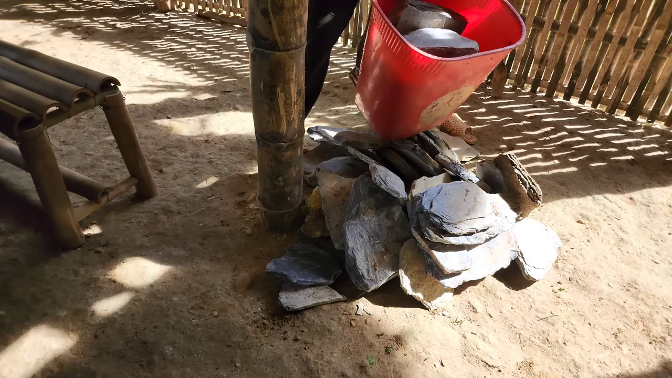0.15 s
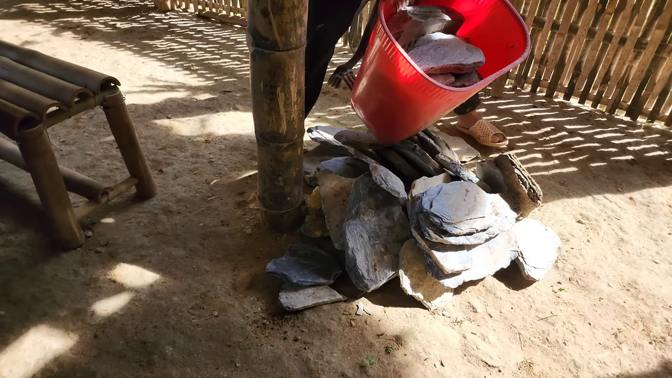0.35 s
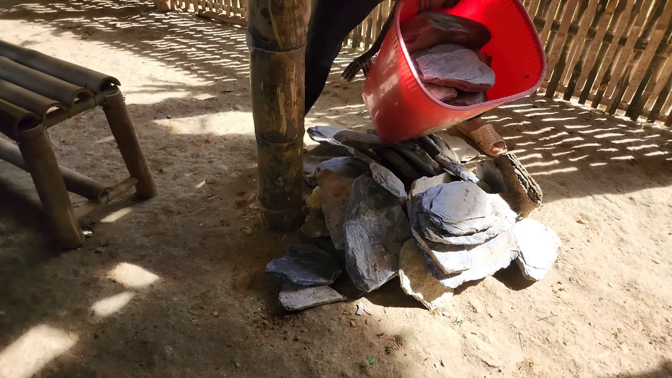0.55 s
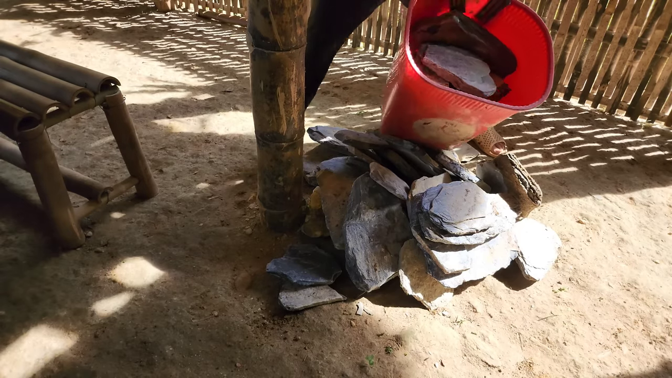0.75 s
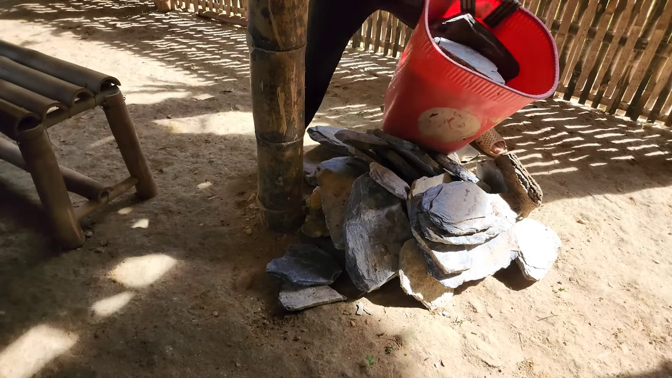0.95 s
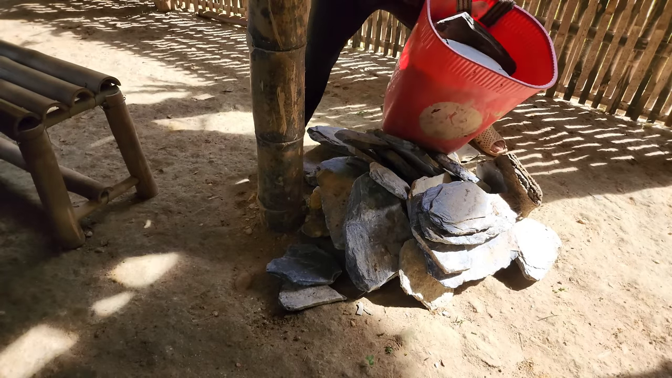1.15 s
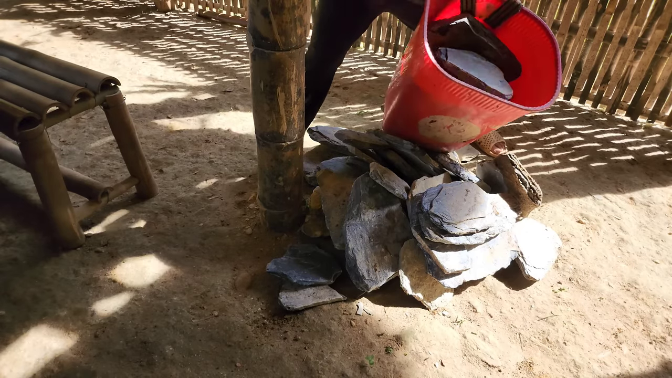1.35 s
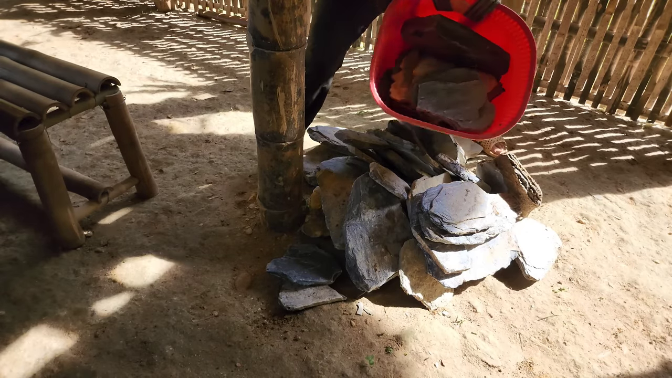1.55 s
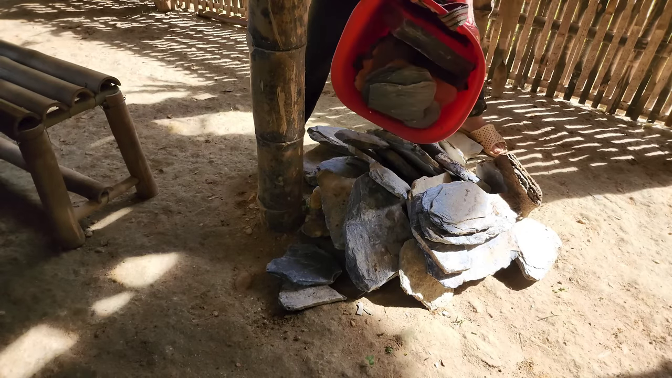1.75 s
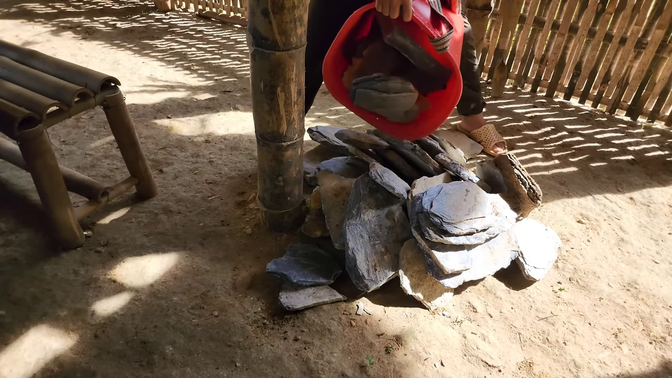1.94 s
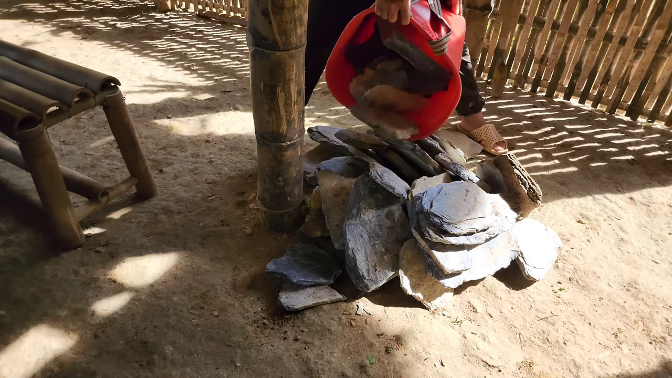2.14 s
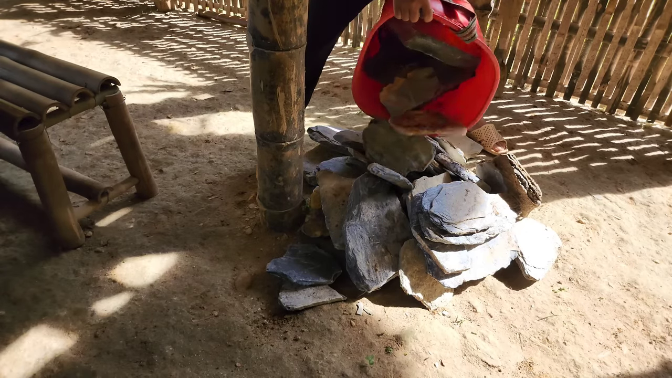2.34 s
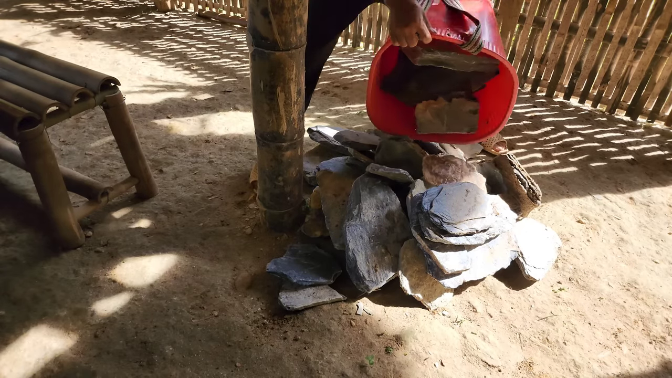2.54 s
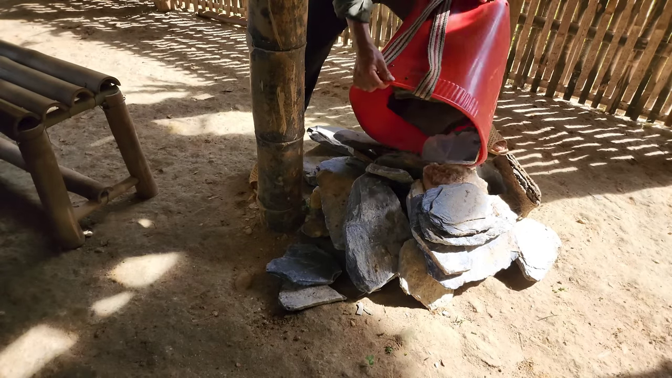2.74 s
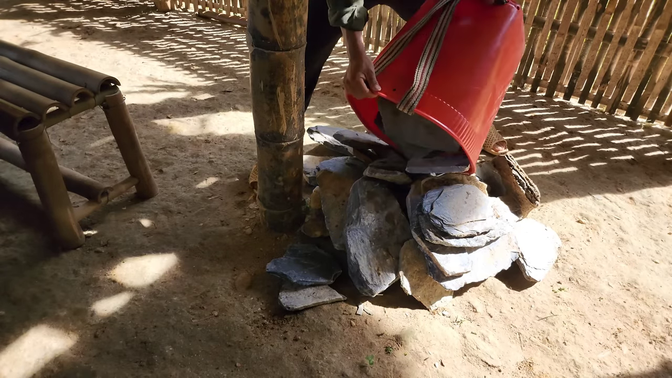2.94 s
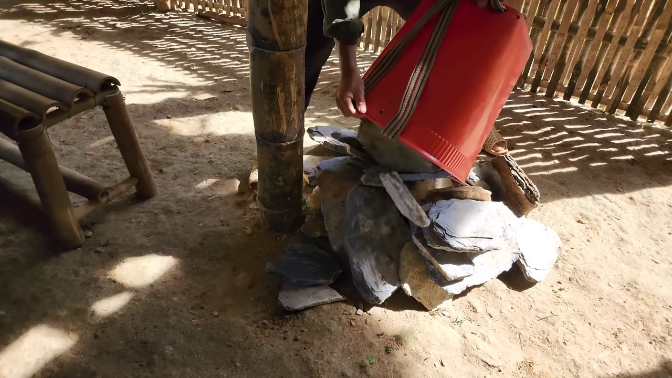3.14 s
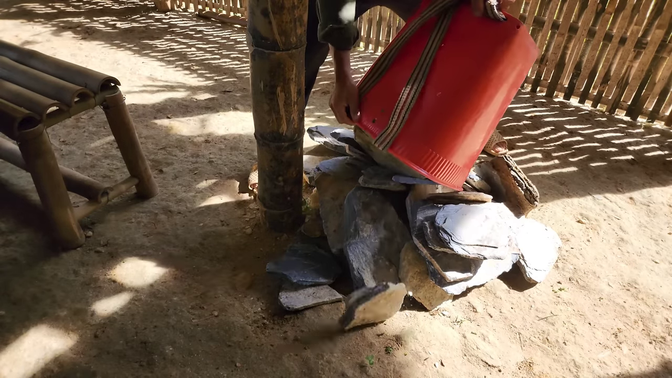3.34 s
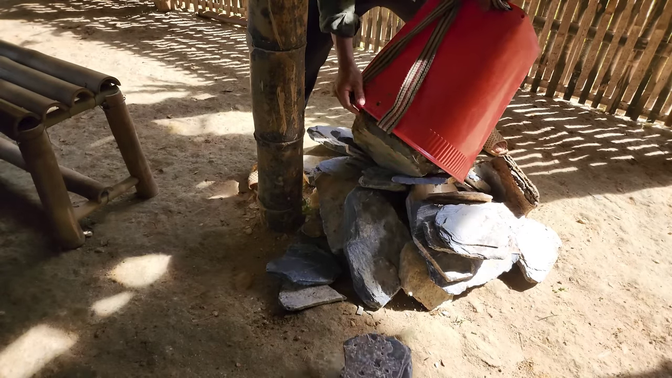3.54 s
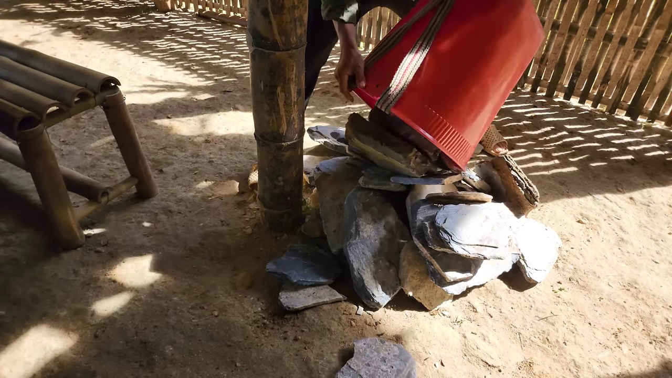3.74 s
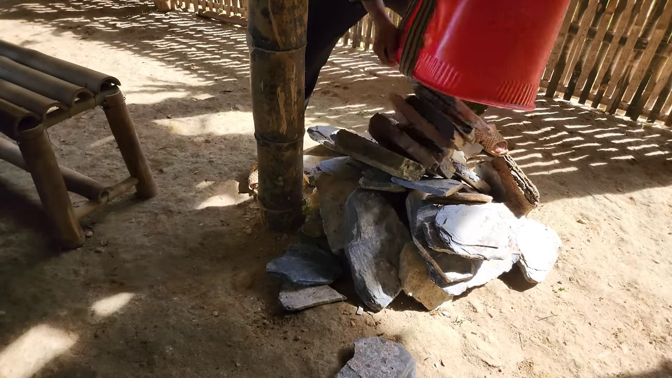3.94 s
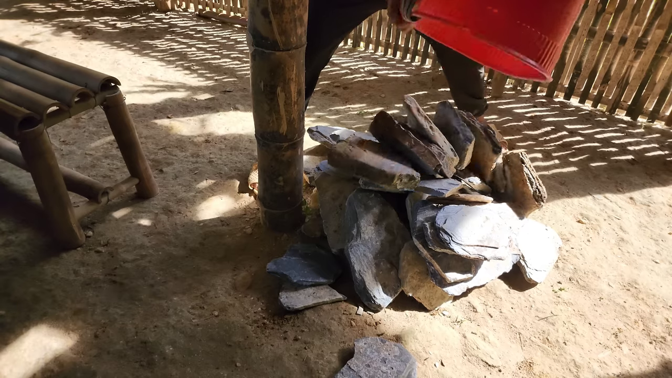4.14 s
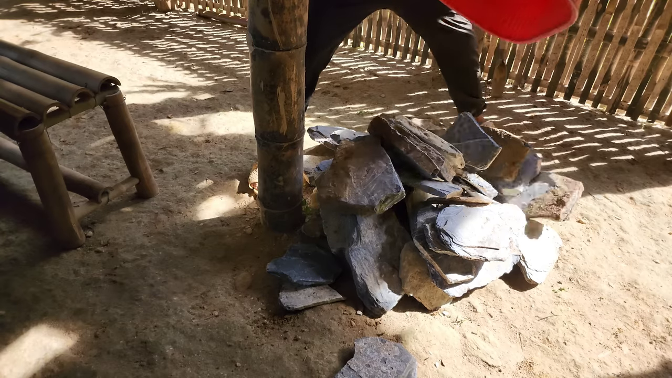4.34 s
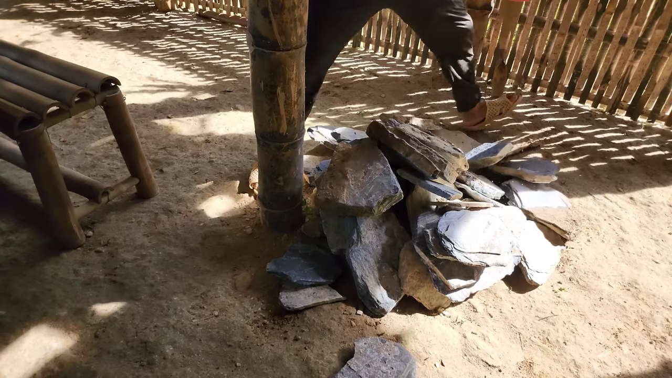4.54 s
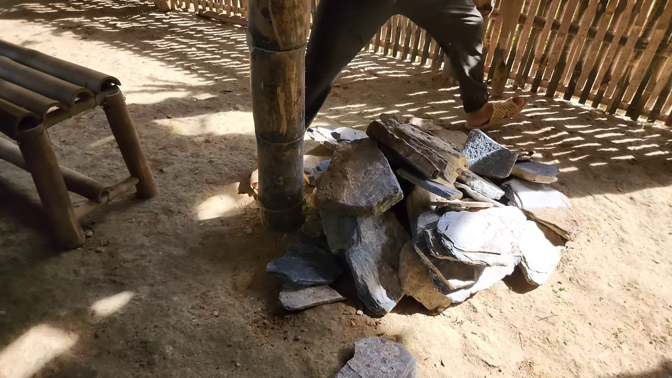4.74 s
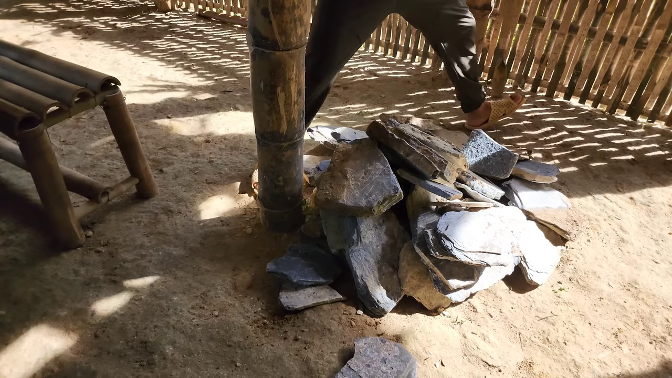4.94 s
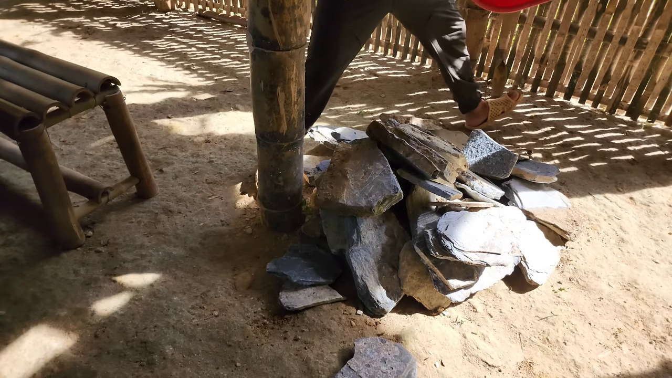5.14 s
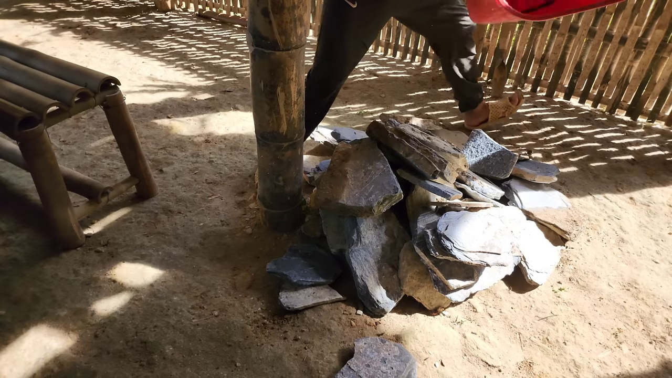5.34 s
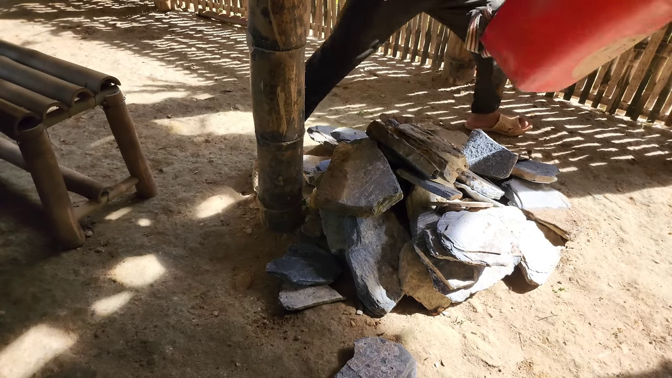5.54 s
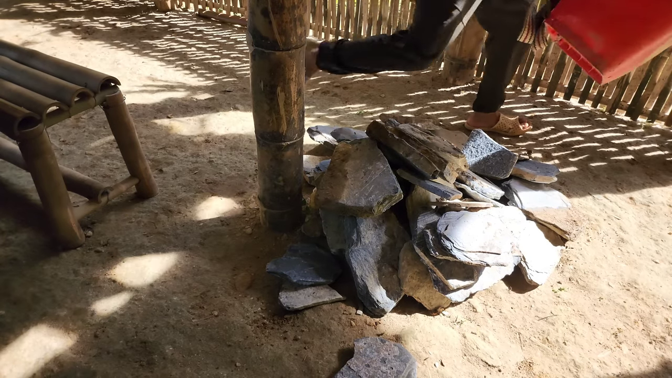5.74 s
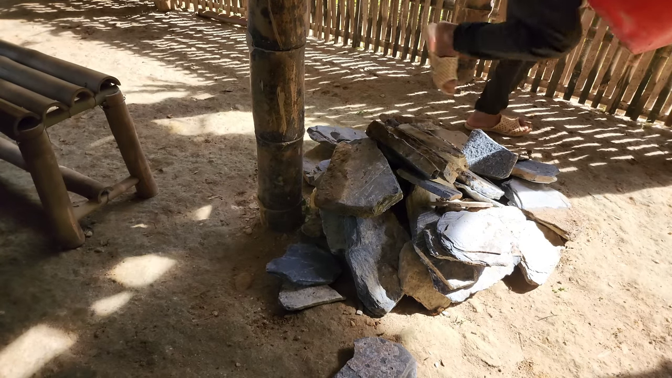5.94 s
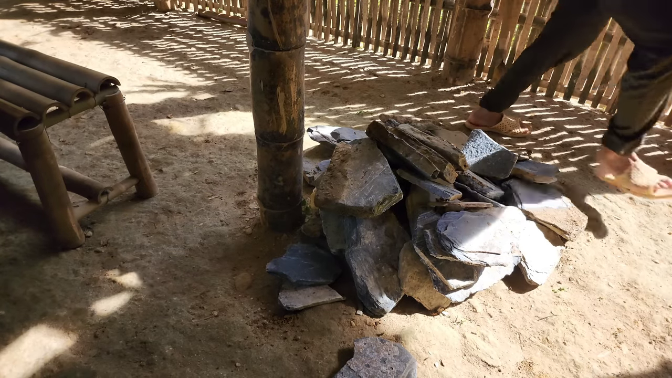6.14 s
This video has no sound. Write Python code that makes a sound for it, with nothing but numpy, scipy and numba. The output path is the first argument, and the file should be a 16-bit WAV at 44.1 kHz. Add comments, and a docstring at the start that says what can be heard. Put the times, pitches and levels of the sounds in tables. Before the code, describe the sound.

Under an open bamboo shelter, flat stones knock lightly in a plastic bucket, then pour out in a dense, hard clatter with scrapes, gritty hiss, ringing slab notes and hollow bucket booms. A last group tumbles onto the pile, then a few soft steps and a distant falling bird call over faint insects. Recorded a couple of metres away, with low wind gusts.

```python
"""Stones tumbling from a bucket

Flat stones shift, scrape and tumble out of a plastic bucket onto a pile under an open bamboo shelter.
Struck modes make the stone clacks, the clear-ringing slab and the booming bucket; grit is gated noise.
Soft steps and a far bird, a gliding tone, follow; insects throughout and several wind gusts are shaped noise.
A phone stands a couple of metres off."""
import sys
import numpy as np
from scipy import signal
from scipy.fft import rfft, irfft
from scipy.io import wavfile
from scipy.ndimage import uniform_filter1d
from numba import njit

SR = 44100
rng = np.random.default_rng(int(sys.argv[2]) if len(sys.argv) > 2 else 0)


def store_pcm(level_fs):
    """Save levels as 16-bit WAV."""
    pcm = np.round(np.clip(level_fs, -1, 1) * 32767).astype(np.int16)
    wavfile.write(sys.argv[1], SR, np.atleast_2d(pcm).T)


def amplitude_ratio(level_db):
    """Convert a level in decibels to the matching linear amplitude (field) ratio."""
    exponent = np.asarray(level_db, float) / 20
    return 10 ** exponent


N = 277006  # length in samples

# modes of the clear-ringing slab: pitch_hz, level_db (relative), t60_s
SLAB_MODES = [(2976, 1, .08), (3348, 5, .065), (6970, -20, .05)]
# modes of the plastic bucket's wall: pitch_hz, level_db (relative), t60_s
BUCKET_MODES = [(107.7, -3.5, 0.17), (143.3, -4, 0.17), (175, -6, 0.2), (210.4, 7, 0.062),
                (327.6, -5.5, 0.0983), (557, -1.5, .06), (626, -14.5, 0.37)]
# colour of the rough stones: frequency_hz, level_db (relative)
STONE_COLOUR = [(210, -44), (350, -24), (492, -30), (788, -10.5), (1820, 6), (2250, 1), (2770, -30.5),
                (3600, 0.5), (5690, -52.5), (8000, -28.5), (10400, -61), (17600, -120)]
# colour of grit noise: frequency_hz, level_db (per Hz, relative)
GRIT_COLOUR = [(1760, -12), (3000, -13.5), (3170, -16), (3430, -21), (4050, -22.5), (4900, -22.5),
               (7350, -20.5), (9530, -30.5), (14800, -22), (16000, -44)]
# sliding load: time_s, stone_motion_db, weight_on_bucket_wall_db
SLIDING_LOAD = [(0.0, -51.5, -46.5), (0.45, -51.5, -54.5), (1.03, -43, -40.5), (1.26, -64, -66),
                (1.52, -38, -40), (1.75, -32, -18), (1.82, -26, -31), (2.15, -41.5, -31), (2.66, -32, -35),
                (2.89, -25.5, -24), (2.99, -21, -21), (3.17, -21, -30), (3.32, -36.5, -33.5),
                (3.55, -71, -49), (3.8, -47, -39), (4.04, -43, -42.5), (4.42, -32, -43.5),
                (4.69, -44.5, -50.5), (4.9, -67, -64.5), (5.27, -74.5, -72.5), (5.88, -61, -56),
                (6.28, -62, -62)]


def table(rows, x):
    """Columns after the first, joined by straight lines at x."""
    first, *rest = np.transpose(rows)
    return [np.interp(x, first, column) for column in rest]


def colour_db(points, hz):
    """A spectrum read on a log-frequency axis."""
    point_hz, db = np.transpose(points)
    return np.interp(np.log(np.maximum(hz, 1)), np.log(point_hz), db)


def noise(points):
    """Coloured noise of rms 1; left and right share the bass and part in the treble."""
    hz = np.arange(N // 2 + 1) * SR / N
    mid, side = rfft(rng.standard_normal((2, N))) * amplitude_ratio(colour_db(points, hz))
    apart = np.clip(hz / 830.0, 0, 1)
    pair = np.array([mid + apart * side, mid - apart * side])
    x = irfft(pair / np.sqrt(1 + apart ** 2), N)
    return x / x.std()


def walk(rate):
    """Random levels, rate of them a second, joined by ramps; spread near 1."""
    hold = int(SR / rate)
    levels = np.repeat(rng.standard_normal(N // hold + 1), hold)
    return 1.2 * uniform_filter1d(levels, hold)[:N]


@njit
def add_modes(out, start, pole, rise, left, right):
    """Each row is a mode that swells in over the contact and dies away."""
    for k in range(len(start)):
        z, soft = 1 + 0j, 1.
        for i in range(start[k], out.shape[1]):
            out[0, i] += (1 - soft) * (z * left[k]).imag
            out[1, i] += (1 - soft) * (z * right[k]).imag
            z, soft = z * pole[k], soft * rise[k]
            if abs(z) < 1e-3:
                break


def ring(s, hz, db, t60, contact, scatter=1., lag_s=0.):
    """Struck modes; each reaches the two microphone ports with a steady or scattered lag and its own phase."""
    s, hz, db, t60, contact = (np.ravel(a) for a in np.broadcast_arrays(s, hz, db, t60, contact))
    phase_chance, lag_chance = rng.standard_normal((len(s), 2)).T
    gain = amplitude_ratio(db) * np.exp(2j * np.pi * phase_chance)
    lag = lag_s + scatter * 0.00013 * lag_chance  # s between the ports
    split = np.exp(1j * np.pi * hz * lag)
    pole = np.exp(2j * np.pi * hz / SR - np.log(1000) / (np.maximum(t60, 1e-3) * SR))
    rise = np.exp(-1 / (contact * SR))
    out = np.zeros((2, N))
    add_modes(out, (s * SR).astype(np.int64), pole, rise, gain * split, gain / split)
    return out


def bursts(s, db, t60):
    """Envelope that jumps at each time and decays."""
    spikes = np.zeros(N)
    np.add.at(spikes, (s * SR).astype(int), amplitude_ratio(db))
    return signal.lfilter([1], [1, -np.exp(-np.log(1000) / (t60 * SR))], spikes)


def rubbed(modes, column, count, contact, detune, span=(0, (N - 1) / SR)):
    """Small random knocks on an object's modes, as strong as one column of the sliding load."""
    when, which, offset = rng.random((count, 3)).T
    s = span[0] + when * (span[1] - span[0])
    hz, db, t60 = np.array(modes)[(which * len(modes)).astype(int)].T
    load_db = table(SLIDING_LOAD, s)[column]
    return ring(s, hz * (1 + detune * (2 * offset - 1)), load_db + db, t60, contact)


def clacks():
    """A rough stone chatters as it lands: a crowd of very short modes while the faces seat, and a gritty crack."""
    # stone on stone: start_s, level_db, then relative to it upper_body_db, body_top_db, crack_db
    landings = [(0.014, -33.5, -25.5, -34, -22.5), (0.179, -28, -5.5, -7, -18.5),
                (0.276, -45.5, -13, -22, -16), (0.326, -51, -3, -12.5, -6.5), (0.393, -41.5, -4, -20, -20),
                (0.436, -43, -3.5, -29, -13.5), (0.506, -40.5, 1, -8, -11.5), (0.55, -16, -19, -55, -51),
                (0.633, -29.5, -26, -29, -29), (0.735, -34.5, -21, -23, -11.5),
                (0.757, -12.5, -3, -11.5, -24), (0.807, -11.5, -25, -35, -42), (0.846, -22, -19, -24, -31),
                (0.905, -44, -18, -21, -14), (0.951, -32, -36, -28, -24), (0.971, -16.5, -18.5, -37, -33.5),
                (1.011, -27.5, -25, -33, -28), (1.055, -34, -8, -12, -21), (1.07, -23, -11, -27, -32),
                (1.081, -23, -7.5, -26, -29), (1.121, -21.5, -10.5, -22, -27),
                (1.166, -26.5, -15, -12, -25), (1.234, -25, -8, -18, -32), (1.4, -35.5, -13, -31, -25),
                (1.473, -29, -11, -27, -25), (1.489, -25, -28, -35, -32), (1.526, -34.5, -9, -15, -18),
                (1.547, -34, -6, -11, -22), (1.561, -21.5, -17, -20, -32), (1.58, -12.5, -21, -23, -33),
                (1.601, -8.5, -16, -23, -43), (1.616, -3, -17, -28, -37), (1.628, -5, -9.5, -16, -43),
                (1.637, -1.5, -24, -32, -37), (1.664, 2.5, -14, -35, -30.5), (1.699, -10, -10.5, -30, -50),
                (1.739, -4.5, -18, -44, -41), (1.773, -13, -25, -42, -30), (1.786, -8.5, -6.5, -22.5, -33),
                (1.805, -1, -36, -35, -42), (1.826, -9.5, -9.5, -33, -44), (1.846, -7.5, -11, -28, -33),
                (1.875, -5.5, -4.5, -16.5, -29), (1.933, -30, -10, -4, -19), (1.956, -14, -12, -27, -35),
                (1.984, -18, -4, -26, -34), (2.005, -25, -21, -34, -29), (2.072, -11.5, -15, -26, -31),
                (2.099, -16, -23, -36, -35), (2.12, -14.5, -17, -24, -39), (2.165, -12, -28, -32, -38),
                (2.191, -16, -37, -34, -33), (2.243, -40, -17, -16, -8.5), (2.266, -23, -13, -29, -21.5),
                (2.316, 1, -7, -23, -25.5), (2.37, -10, -4, -29, -47), (2.38, -1.5, -13.5, -20, -41),
                (2.405, -12, 0.5, -11, -25), (2.461, -26.5, -23, -22, -14), (2.493, -15, -12, -23, -28),
                (2.546, -11.5, -12.5, -24, -28), (2.574, -11.5, -9, -32, -20.5), (2.586, -7, -4, -33, -36),
                (2.594, -13, -5, -7.5, -25.5), (2.639, -15, -3.5, -17, -17), (2.651, -7.5, -37, -43, -65),
                (2.687, -15, -16, -28, -42), (2.718, -17, -7, -17, -28), (2.747, -15, -10.5, -38, -48),
                (2.776, -5.5, -7.5, -21, -30), (2.805, -3, -14.5, -27, -27), (2.853, -15.5, 6, -4, -15.5),
                (2.892, -13, -18, -33, -18.5), (2.911, -10.5, 2, -34, -20), (2.935, -3.5, -21, -16, -17),
                (2.976, -9, 0.5, -29, -21.5), (3.021, -14, -22, -48, -22), (3.046, -7, -10, -37, -35),
                (3.056, -13.5, -5, -35, -40), (3.066, -3.5, -0.5, -31, -31), (3.101, -9, 0.5, -14, -24),
                (3.151, -20, -12, -20, -25), (3.17, -9.5, -7, -36, -25.5), (3.187, -17, -2, -36, -33),
                (3.233, -10, -8.5, -38, -28.5), (3.25, -17.5, 3, -34, -27), (3.279, -14, 2, -31, -31),
                (3.384, -11, -17.5, -17.5, -24), (3.45, -45.5, -5, 7, -3.5), (3.516, -41.5, -9, -20, -2.5),
                (3.525, -38, -3, -19, -12), (3.556, -29.5, -6, -18, -17.5), (3.567, -32, -17, -21, -11),
                (3.585, -33.5, -5, -5, -17), (3.692, -33, -4, -31, -40), (3.75, -31, -16, -40, -27),
                (3.791, -29, -15, -29, -33), (3.804, -28, -4.5, -10, -32), (3.867, -17, -9, -35, -37),
                (3.873, -17.5, -5.5, -29, -34), (3.898, -10.5, -5, -24, -40), (3.958, -14.5, 0.5, -22, -47),
                (4.018, -35, -21, -33, -44), (4.048, -17.5, -9.5, -52, -53), (4.059, -19, -12.5, -51, -43),
                (4.105, -20.5, -12.5, -44, -39), (4.141, -25, -9, -40, -28), (4.159, -7.5, -7, -18.5, -36),
                (4.217, -3.5, -6, -24, -41), (4.264, -5, -4, -30, -26), (4.353, -19.5, -3, -17, -20),
                (4.385, -18.5, -14, -32, -52), (4.426, -17.5, -8, -50, -46), (4.464, -10, -6, -52, -43),
                (4.487, -8.5, 1.5, -55, -28.5), (4.516, -11, 2, -22, -15.5), (4.533, -9, 4.5, -19, -30),
                (4.596, -16, -7.5, -35, -57), (4.633, -18, -6.5, -42, -54), (4.712, -26, -11, -24, -36),
                (4.745, -22.5, -6, -43, -38), (4.802, -12.5, -6.5, -33, -61), (4.9, -37.5, -18, -29, -32.5),
                (5.182, -51, -8.5, -19.5, -18.5), (5.435, -55.5, -13.5, -18, -19.5),
                (5.468, -47.5, -6.5, -20, -15), (5.655, -51, -20, -18.5, -16.5),
                (5.733, -44.5, -10.5, -26, -31), (5.747, -41.5, -3, -25.5, -28.5),
                (5.842, -50, -6, -31.5, -26), (5.899, -46.5, -15, -28.5, -23),
                (5.921, -45.5, -13, -22.5, -21), (6.068, -45, -19, -22, -24),
                (6.138, -47, -18.5, -20.5, -13.5)]
    s, db, upper_db, top_db, crack_db = np.transpose(landings)[..., None]
    chance = rng.random((len(s), 3, 90))
    hz = 400 * (7000 / 400) ** ((np.arange(90) + chance[:, 0]) / 90)
    upper = np.clip(np.log2(hz / 800), 0, 1)
    top = np.clip(2 * np.log2(hz / 2400), 0, 1)
    low_body_db = upper * upper_db + .5 * colour_db(STONE_COLOUR, hz)
    high_body_db = top_db + 1.5 - 23.0 * np.log2(hz / 4000)
    body_db = (1 - top) * low_body_db + top * high_body_db
    # share of the seating time; many modes start with the first touch
    late = np.maximum(chance[:, 1] - .15, 0) ** 1.3
    mode_db = db - 10 + body_db - 12 * late ** 1.13 + 7 * chance[:, 2]
    body = ring(s + .025 * late, hz, mode_db, 0.025 * (1000 / hz) ** 0.064, 0.000067)
    start, grit_db = s[:, 0], (db + crack_db)[:, 0]
    crack = bursts(start, grit_db - 8.5, 0.033) + bursts(start, grit_db + 5.5, 0.17)
    return body + crack * noise(GRIT_COLOUR)


def pings():
    """One note stands out of the blow, split into a close pair of modes."""
    # blows that leave a clear note: start_s, level_db, pitch_hz, t60_s (before its limits below)
    notes = [(0.277, -35, 1780, .05), (0.774, -3.5, 685, 0.025), (0.808, -21, 930, .08),
             (0.846, -19.5, 577, 0.053), (1.122, -20, 940, 0.18), (1.167, -15, 940, 0.028),
             (1.58, -11.5, 610, 0.14), (1.6, -9, 607, 0.056), (1.621, -7, 3640, 0.046),
             (1.63, -0.5, 580, 0.076), (1.664, 3.5, 639, 0.044), (1.672, -13, 1500, .07),
             (1.7, -13, 566, 0.055), (1.771, -6, 1474, 0.036), (1.785, -12, 1000, 0.087),
             (1.804, -9, 650, 0.048), (1.845, -7.5, 1003, 0.059), (1.873, 3, 1380, 0.036),
             (2.316, -3.5, 760, .094), (2.402, -8.5, 1697, 0.045), (2.406, -6.5, 2390, 0.06),
             (2.405, -15, 4405, 0.053), (2.574, -2.5, 2350, 0.057), (2.593, -2.5, 1515, 0.046),
             (2.594, -26, 3660, .09), (2.644, -20.5, 4170, 0.046), (2.911, -4, 2044, 0.057),
             (2.978, -4, 2014, 0.058), (3.021, -6.5, 560, 0.067), (3.064, -3, 1164, 0.085),
             (3.187, -7.5, 1137, 0.087), (3.212, -25, 3620, 0.067), (3.277, 8.5, 1280, 0.029),
             (3.894, -4.5, 1436, 0.061), (3.9, -13.5, 2056, 0.15), (3.964, -10, 3460, 0.03),
             (4.02, -8, 1360, 0.027), (4.159, -7, 862, 0.04), (4.166, -20.5, 4020, 0.086),
             (4.173, -8, 1220, 0.08), (4.214, 10.5, 1342, 0.012), (4.218, -19, 4030, .042),
             (4.262, -9, 1886, 0.13), (4.266, -16, 3900, 0.056), (4.35, 4, 1520, 0.017),
             (4.487, 0.5, 2230, 0.028), (4.518, -21, 1790, 0.065), (4.539, -3, 1370, 0.024),
             (4.545, -14.5, 3210, 0.069), (4.548, -2, 1412, 0.04), (4.635, -38.5, 4020, 0.091),
             (4.745, -18, 870, 0.039), (4.802, -16.5, 915, 0.047), (4.804, -33, 4900, .05),
             (6.068, -37.5, 630, 0.093)]
    s, db, hz, t60 = np.transpose(notes)[..., None]
    t60 = np.clip(t60, .015, .2)
    return ring(s, hz * [1, 1.03], db - [4, 12], t60, 0.0025, scatter=0.26, lag_s=.00006)


def slab():
    """The same few modes at every blow; the spot hit sets the share of the second."""
    # blows on the slab: start_s, level_db, second_mode_change_db
    slab_blows = [(1.6167, -17, -4), (1.6356, -9, -16.5), (1.6634, -21.5, -29), (1.7998, -43, 3),
                  (1.8444, -44, 11), (1.8768, -33, -4), (1.935, -31, -7), (2.078, -33, -17),
                  (2.148, -38, 5), (2.24, -33, -11.5), (2.271, -29.5, -6.5), (2.3195, -43, -12),
                  (2.3507, -23, -5), (2.7828, -10, -14), (2.8544, -35.5, -3), (2.937, -24.5, -16.5),
                  (3.077, -15.5, -15.5), (3.1076, -3, -7.5), (3.1507, -17, -9.5), (3.211, -44, 5.5),
                  (3.2322, -30, 1), (3.245, -25, -9), (3.262, -29.5, -10.5), (3.3867, -29, -9)]
    s, db, upper_db = np.transpose(slab_blows)[..., None]
    hz, mode_db, t60 = np.transpose(SLAB_MODES)
    second = np.arange(len(SLAB_MODES)) == 1
    return ring(s, hz, db + mode_db + upper_db * second, t60, 0.00014, scatter=0.21, lag_s=.00006)


def drags():
    """Uneven slips keep the dragged stone's resonances singing, fainter towards the end of the drag."""
    # stone dragged over stone: (start_s, end_s, level_db), then its resonances:
    # pitch_hz, width_hz, level_db (relative)
    scrapes = [ ((1.11, 1.215, -30), [(930, 120, -8.5), (1550, 64, -6), (1500, 47, -24), (2120, 120, -4.5),
               (2760, 84, -14), (3640, 66, -14), (4370, 19, -31), (4550, 60, -15), (5530, 60, -22),
               (6600, 60, -18.5)]), ((1.955, 2.03, -46), [(1000, 54, -17), (1600, 99, 9), (2150, 66, -17),
               (2390, 12, 1.5), (3510, 99, 5), (5650, 47, -12.5), (7140, 58, -26)]), ((2.08, 2.21, -35.5),
               [(1054, 30, -8), (1250, 120, 5.5), (1583, 87, 10.5), (2220, 40, -21), (2443, 48, 1.5),
               (3100, 56, -2), (3570, 61, -9), (7320, 32, -18)]), ((2.575, 2.75, -38.5), [(1560, 68, -8),
               (2020, 61, -16), (2390, 32, 5.5), (3500, 54, -15), (3640, 26, -10.5), (4470, 29.6, -12),
               (7980, 130, -7)]), ((4.69, 4.8, -45.5), [(2127, 24, 3.5), (3230, 110, -8), (4020, 37, -10),
               (4610, 58, -22)]), ]
    out = 0
    for (start, end, db), peaks in scrapes:
        hz, width, peak_db = np.transpose(peaks)
        slips = rng.random((int(400 * (end - start)), 2 + len(hz)))
        when, size, spot = slips[:, :1], slips[:, 1:2], slips[:, 2:]
        slip_db = db + peak_db + 16 * size - 12.5 - 6 * when
        t60 = np.log(1000) / (np.pi * width)  # a narrow resonance rings longer
        slip_hz = hz + width * (spot - .5)
        out = out + ring(start + (end - start) * when, slip_hz, slip_db, t60, 0.000087, scatter=0.53)
    return out


def thuds():
    """A soft push on the bucket, or a dull step: one strongest ring and all the wall modes, struck unevenly."""
    # bucket blows and dull steps: start_s, level_db, strongest_ring_hz
    pushes = [(0.011, -30.5, 113), (0.18, -27, 152), (0.396, -47, 154), (0.471, -41, 158),
              (0.557, -36, 159), (0.626, -20.5, 158), (0.783, -32, 230), (0.803, -27.5, 153),
              (0.845, -23.5, 178.5), (0.885, -39, 226), (0.965, -21.5, 158), (0.99, -22.5, 215),
              (1.075, -14, 189.3), (1.097, -19.5, 212), (1.135, -23.5, 148), (1.19, -27.5, 160),
              (1.248, -39, 246), (1.401, -48.5, 256), (1.486, -32.5, 112), (1.605, -16, 141),
              (1.629, -15, 211), (1.657, -8, 175.5), (1.696, -12.5, 166), (1.735, -9, 175),
              (1.781, -12, 175), (1.808, -10, 175), (1.829, -6.5, 193), (1.853, -11, 157),
              (1.958, -11.5, 210), (1.98, -9, 170), (2.074, -10, 141), (2.086, -14, 185.7),
              (2.118, -11.5, 177), (2.161, -11, 175), (2.281, -17, 190), (2.334, -5.5, 203),
              (2.35, -10.5, 208.5), (2.368, -3.5, 178), (2.398, -10, 163.3), (2.428, -17, 140),
              (2.463, -24, 200), (2.526, -23.5, 190), (2.567, -27, 170), (2.646, -4.5, 186.3),
              (2.687, -24, 193), (2.745, -11, 142.4), (2.789, -6, 141), (2.821, -11, 175),
              (2.856, -24.5, 186), (2.904, -11.5, 131), (2.938, -14.5, 233), (2.96, -17, 194),
              (3.007, -7, 184.6), (3.042, -18, 187), (3.079, -7, 162.4), (3.102, -14.5, 178),
              (3.128, -15, 193), (3.187, -14, 155), (3.245, -16, 177.6), (3.262, -15.5, 190),
              (3.29, -19, 131.5), (3.369, -21.5, 174), (3.523, -22, 157), (3.572, -22.5, 189),
              (3.694, -22, 110), (3.712, -23.5, 178), (3.793, -22, 194), (3.827, -23, 147),
              (3.888, -15.5, 181), (3.92, -14.5, 167), (4.084, -39.5, 147), (4.207, -32.5, 235),
              (4.26, -37, 170), (4.343, -35.5, 286), (4.402, -33.5, 247), (4.525, -37, 199),
              (4.584, -42, 193), (4.739, -36, 111), (4.794, -41.5, 298), (4.895, -46, 266),
              (5.202, -50.5, 142.6), (5.359, -51.5, 148), (5.475, -43, 143.3), (5.66, -43.5, 154.4),
              (5.738, -41, 224), (5.761, -32, 229), (5.911, -44.5, 156), (6.071, -41.5, 157.4)]
    s, db, hz = np.transpose(pushes)[..., None]
    wall_hz, wall_db, wall_t60 = np.transpose(BUCKET_MODES)
    pitch_chance, level_chance = rng.standard_normal((2, len(s), len(BUCKET_MODES)))
    # once the bucket is lifted away empty (s), thuds ring longer and stir the walls less
    empty = s > 4.0
    push_db = db + wall_db - 6 + 3 * level_chance - 7 * empty
    walls = ring(s, wall_hz * (1 + 0.045 * pitch_chance), push_db, wall_t60, 0.0033)
    return ring(s, hz, db + 8.5, np.where(empty, 0.15, .11), 0.016) + walls


def bucket_rumble():
    """The sliding load drums on the bucket's wall modes with its weight."""
    return amplitude_ratio(5) * rubbed(BUCKET_MODES, column=1, count=900, contact=0.00056, detune=0.082)


def slab_rub():
    """The slab slides with the load for a while, its modes knocked by the moving stones."""
    span_s = 1.75, 3.3
    return amplitude_ratio(-22.5) * rubbed(SLAB_MODES, column=0, count=560, contact=0.0011, detune=.006, span=span_s)


def rattle():
    """Dense short stone ticks follow the motion of the load."""
    when, pitch, size, length = rng.random((26000, 4)).T
    s, hz = when * (N - 1) / SR, 380 * (5000 / 380) ** pitch
    size_db = -2.0 * np.log(1 - size)  # many small, a few large
    t60 = .008 + .022 * length
    tick_db = table(SLIDING_LOAD, s)[0] - 1 + 0.41 * colour_db(STONE_COLOUR, hz) + size_db
    return ring(s, hz, tick_db, t60, 0.0036)


def grit():
    """Grit hisses in random grains, growing more slowly than the motion of the load."""
    when, size = rng.random((2500, 2)).T
    gate = 0.234 + bursts(when * (N - 1) / SR, -3.0 * np.log(1 - size) - 8, 0.015)
    motion_db = table(SLIDING_LOAD, np.arange(N) / SR)[0]
    level_db = -46.5 + 0.55 * (motion_db + 30)
    return amplitude_ratio(level_db) * gate * noise(GRIT_COLOUR)


def shelter(x):
    """Short scattered echoes from ground, posts and fence; alike at both ports in the bass."""
    t = np.arange(int(.25 * SR)) / SR
    decay = np.exp(-np.log(1000) * t / 0.15) * (t > .003)
    mid, side = rng.standard_normal((2, len(t))) * decay
    side = signal.lfilter(*signal.butter(1, 900., "highpass", fs=SR), side)
    tail = np.array([mid + side, mid - side])
    tail = tail / np.sqrt(np.sum(tail ** 2) / 2)
    return signal.fftconvolve(x.mean(axis=0, keepdims=True), tail, axes=1)[:, :N]


def bird():
    """A husky whistle whose tone falls in pitch and wavers, far off and smeared by echoes."""
    # the falling call: time_after_start_s, pitch_hz, level_db (relative)
    call = [(0, 4620, -80), (.015, 4600, -72), (.045, 4550, -75), (.055, 4250, -80), (.065, 4000, -71),
            (.085, 3400, -71), (.097, 2900, -78), (.105, 2350, -76), (.14, 2450, -82)]
    # when the bird calls: start_s
    call_starts = [5.037, 5.96]
    t, out = np.arange(N) / SR, 0
    for start in call_starts:
        hz, db = table(call, t - start)
        on = (t > start) & (t < start + call[-1][0])
        husk, waver = amplitude_ratio(3 * walk(250)), 1 + .035 * walk(600)
        out = out + on * husk * amplitude_ratio(db) * np.sin(2 * np.pi * np.cumsum(hz * waver) / SR)
    return amplitude_ratio(5.5) * (out + amplitude_ratio(5.5) * shelter(out[None]))


def wind():
    """Gusts rumble on the microphone ports: unsteady low noise that swells and fades."""
    # gusts: peak_s, level_db, rise_s, fall_s (each time for 20 dB)
    gusts = [(0.759, -47.5, .3, 0.6), (1.949, -44, 0.13, 1.1), (3.381, -38, 1, 0.67),
             (4.15, -51, 0.93, 0.51), (4.54, -40, 0.66, 0.52)]
    t = np.arange(N) / SR
    swell = 0
    for s, db, rise, fall in gusts:
        swell = swell + amplitude_ratio(db - 20 * np.maximum((s - t) / rise, (t - s) / fall))
    rumble = noise([(15, -41.5), (35, -21.5), (60, -1), (85, -9.5), (160, -49.5)])
    return swell * amplitude_ratio(3 * walk(10)) * rumble


def insects():
    """Narrow bands of noise, each flickering in level."""
    # insect bands: centre_hz, width_hz, level_db
    bands = [(4600, 250, -81.5), (7350, 500, -81)]
    out = 0
    for hz, width, db in bands:
        band = noise([(hz - width, -30), (hz, 0), (hz + width, -30)])
        out = out + amplitude_ratio(db + 2.5 * walk(28)) * band
    return out


def air():
    """Quiet outdoor air: coloured noise that wavers slightly in level."""
    # colour of the air: frequency_hz, level_db (per Hz, relative)
    air_colour = [(35, -34), (60, 0), (103, -2), (233, -13.5), (448, -19), (579, -16), (2970, -23),
                  (4750, -22.5), (6140, -28.5), (7230, -22.5), (10300, -42), (14600, -39.5), (16000, -35.5)]
    return amplitude_ratio(-63.5 + 1.5 * walk(11.0)) * noise(air_colour)


def scene():
    """Stones and bucket, the stones with their echoes, over the outdoor background."""
    stone = clacks() + pings() + slab() + drags()
    load = bucket_rumble() + slab_rub() + rattle() + grit()
    background = bird() + wind() + insects() + air()
    return stone + amplitude_ratio(-4) * shelter(stone) + thuds() + load + background


def roll_off(x):
    """The treble ends steeply here."""
    return signal.sosfilt(signal.butter(12, 16510, fs=SR, output="sos"), x)


def record(dry):
    """The phone drops the deepest bass and the top, and rounds the loudest peaks."""
    thin = signal.sosfilt(signal.butter(2, 55, "highpass", fs=SR, output="sos"), dry)
    rounded = np.tanh(0.72 * thin) / 0.81
    mix = signal.sosfilt(signal.ellip(8, .2, 60, 15350, fs=SR, output="sos"), rounded)
    return roll_off(mix)


dry = scene()
out = record(dry)
store_pcm(out)
```